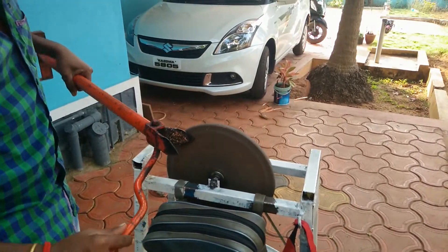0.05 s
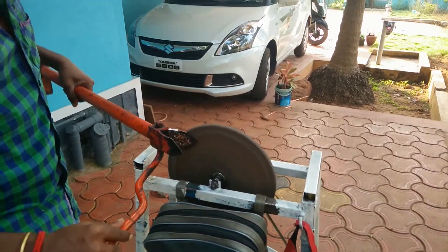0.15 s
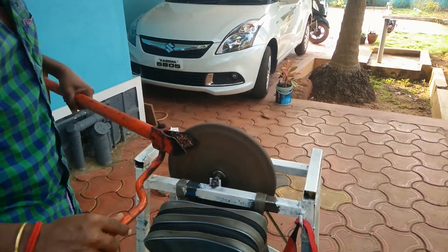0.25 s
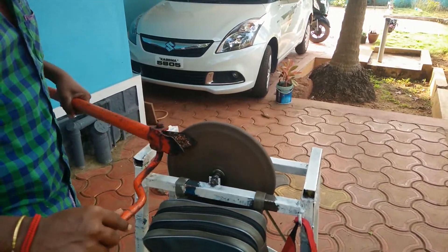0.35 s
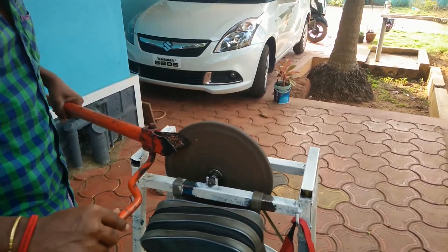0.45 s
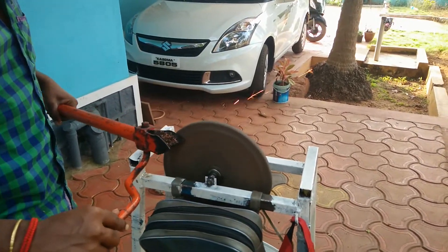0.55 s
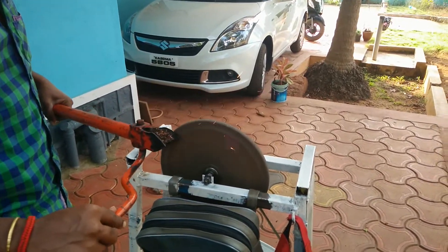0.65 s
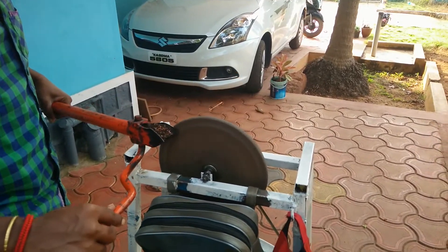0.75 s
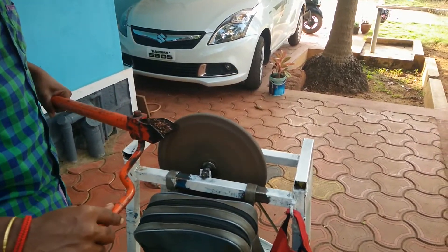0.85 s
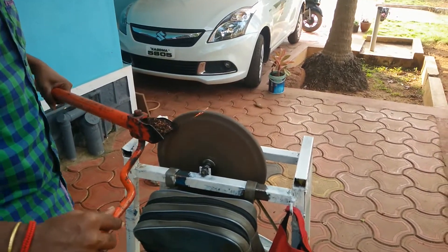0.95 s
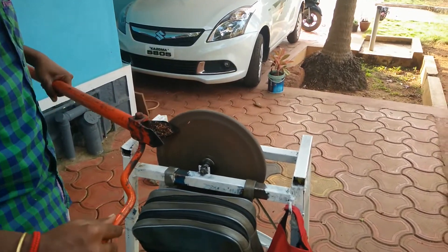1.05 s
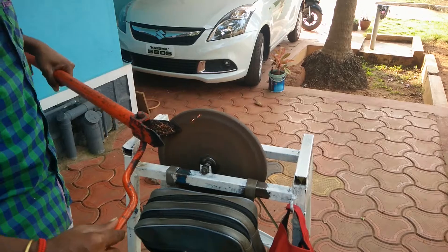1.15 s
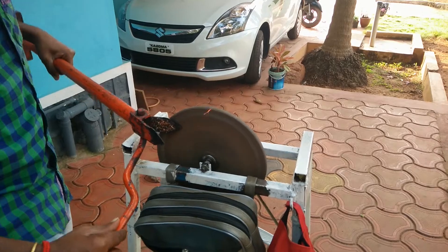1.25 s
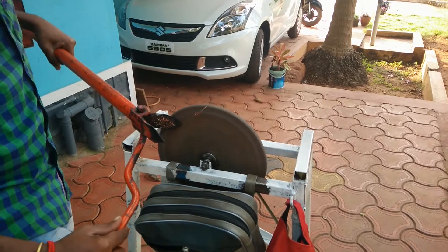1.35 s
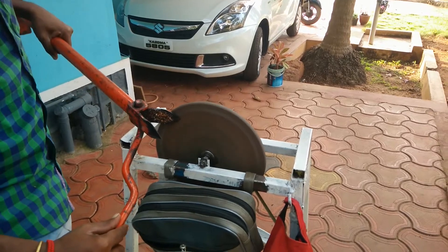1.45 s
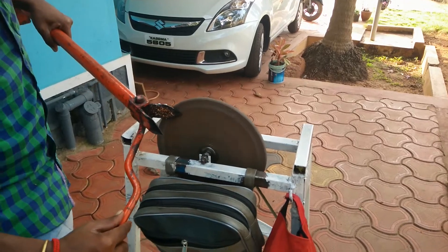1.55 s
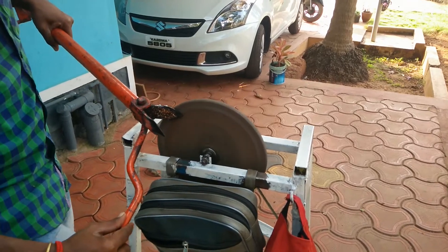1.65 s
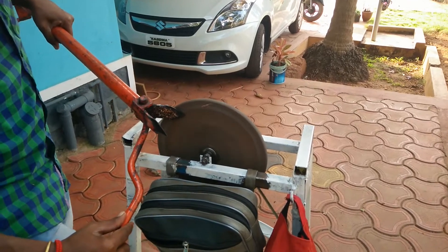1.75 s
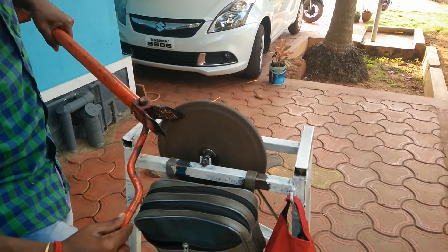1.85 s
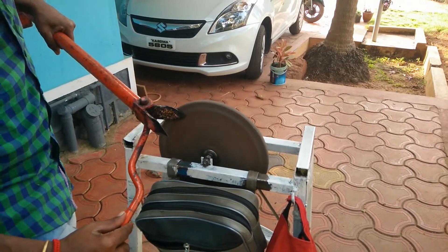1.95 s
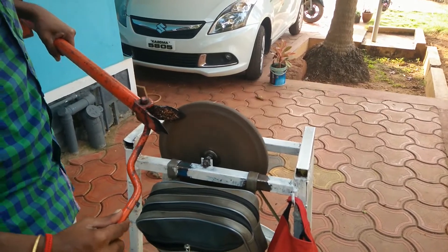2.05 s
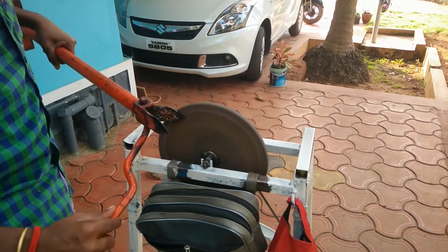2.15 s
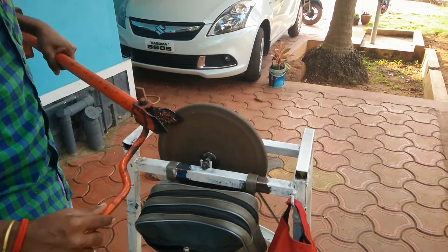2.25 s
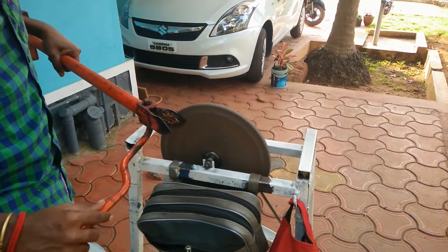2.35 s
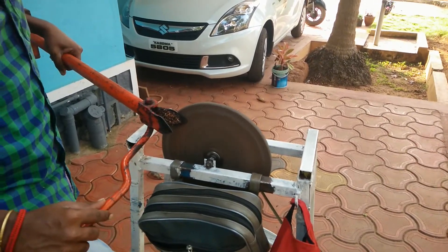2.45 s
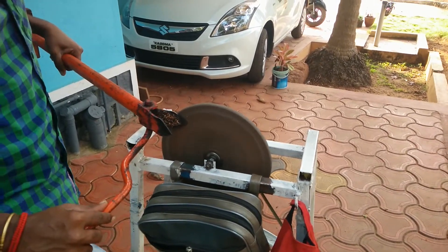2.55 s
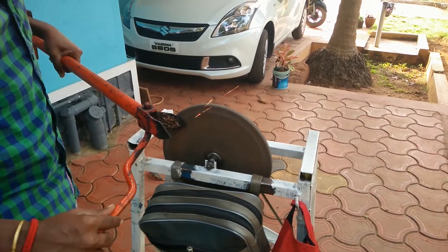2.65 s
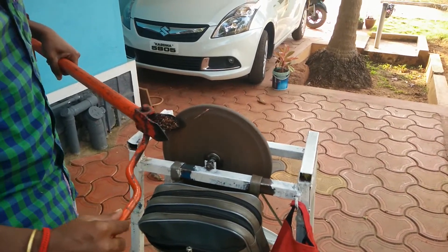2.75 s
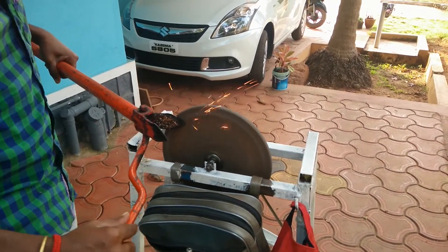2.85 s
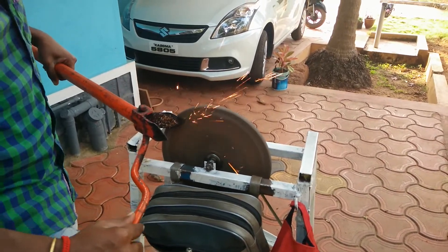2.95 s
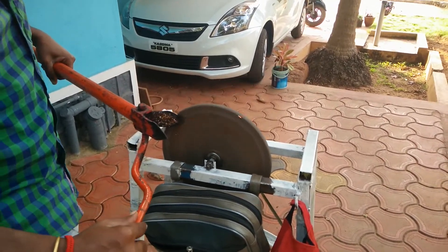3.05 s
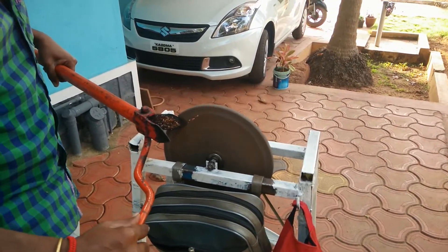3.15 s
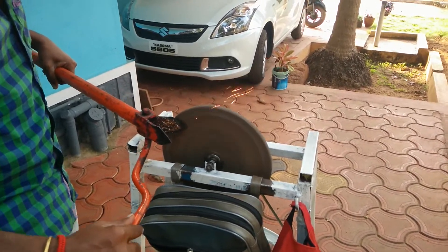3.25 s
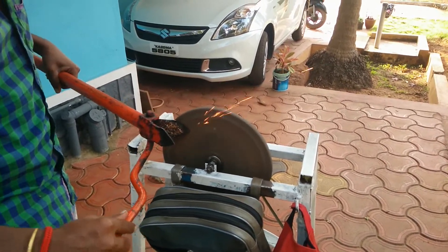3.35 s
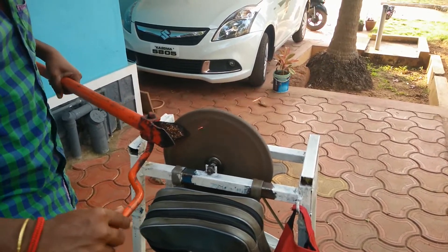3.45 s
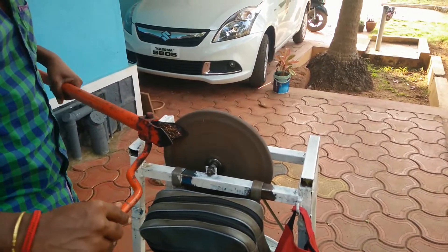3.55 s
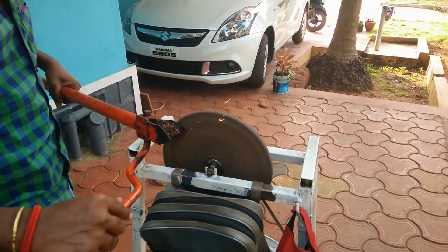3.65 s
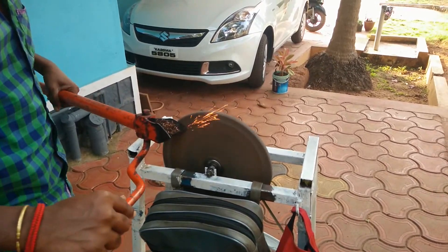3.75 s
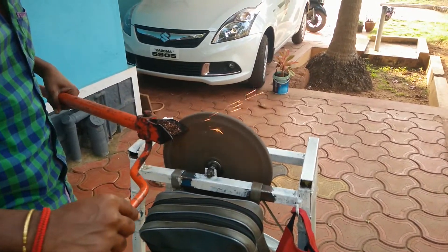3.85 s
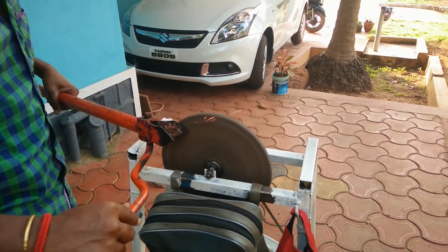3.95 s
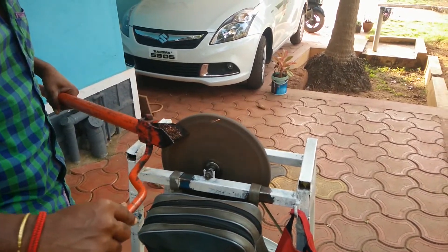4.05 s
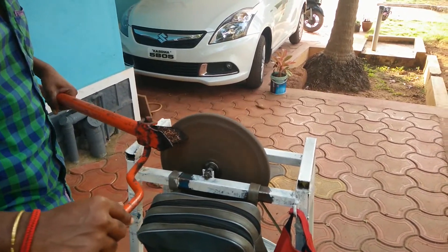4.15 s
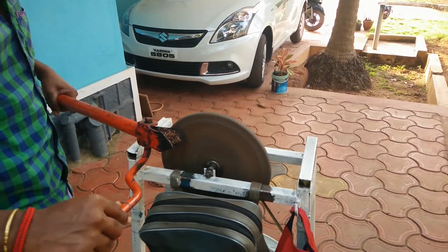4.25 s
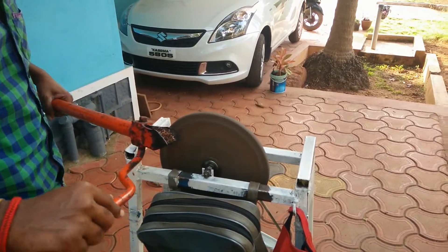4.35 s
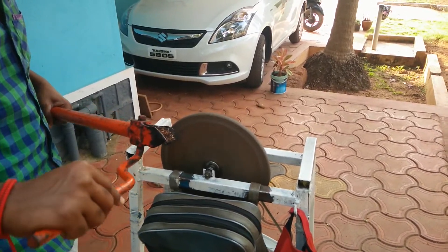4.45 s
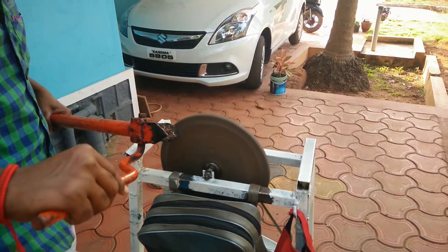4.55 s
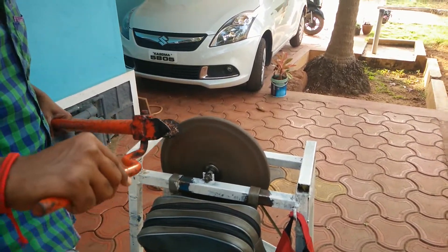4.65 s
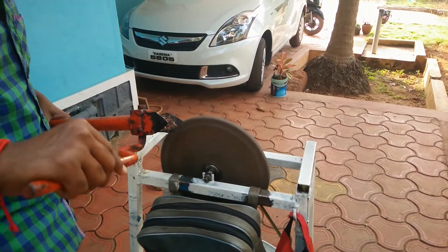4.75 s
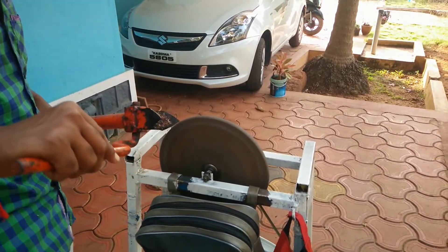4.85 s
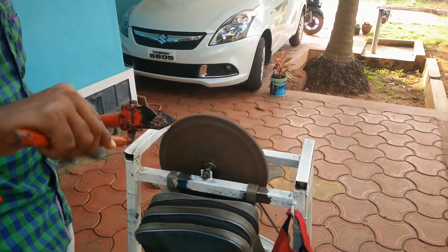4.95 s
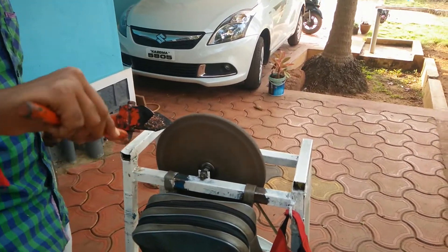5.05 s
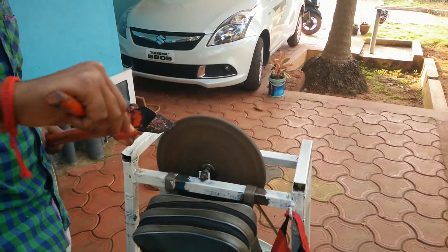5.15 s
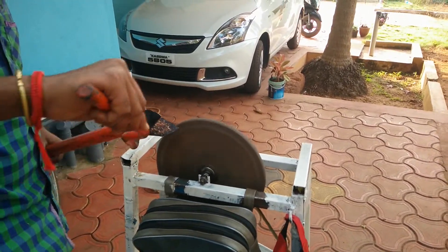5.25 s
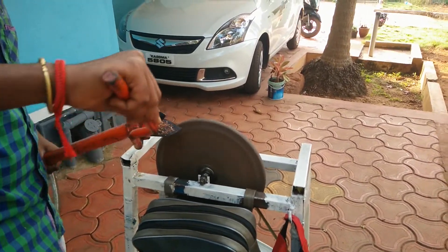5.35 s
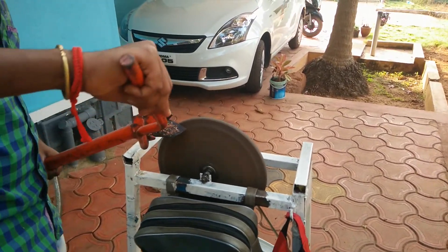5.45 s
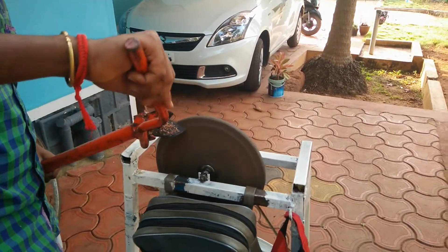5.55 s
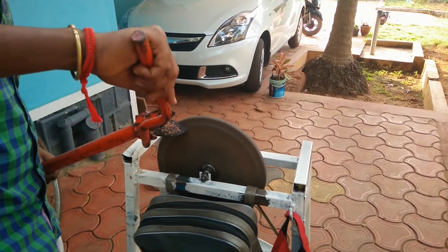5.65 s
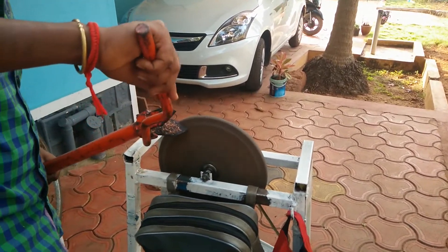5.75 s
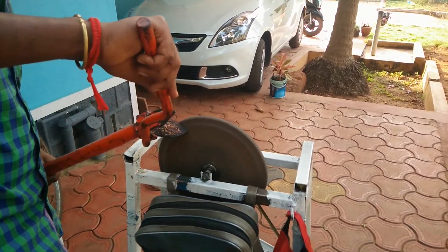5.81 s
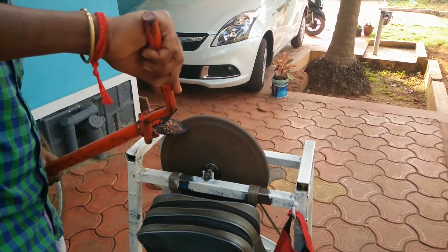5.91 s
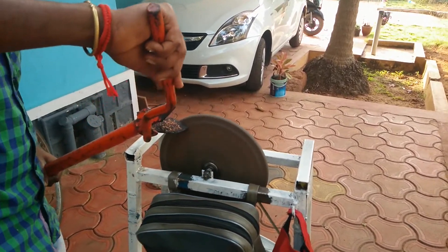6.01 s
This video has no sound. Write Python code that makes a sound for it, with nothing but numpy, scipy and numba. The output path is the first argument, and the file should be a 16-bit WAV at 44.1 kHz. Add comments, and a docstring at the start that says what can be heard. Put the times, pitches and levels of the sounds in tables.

```python
"""In a paved yard, a steel blade is pressed on a spinning grinding wheel, heard at a left and a right microphone port.
The wheel runs out of true, so the blade bounces: each touch is shaped noise for the scrape plus ringing wheel modes.
The blade is lifted, its holder is turned by hand with soft rubs and dull knocks, and it touches again.
Below, the drive hums, rattles and thuds as noise through resonances, over steady yard air and a faint echo.
The right port is the more open one; the highest peaks are limited and clipped."""
import sys
import numpy as np
from scipy import signal
from scipy.fft import rfft, irfft, next_fast_len
from scipy.io import wavfile
from scipy.ndimage import uniform_filter1d, minimum_filter1d, map_coordinates
from numba import njit

SR = 44100
rng = np.random.default_rng(int(sys.argv[2]) if len(sys.argv) > 2 else 0)


def file_out(sig):
    """Save sig as 16-bit WAV at sys.argv[1]."""
    # one column per channel
    cols = np.atleast_2d(sig).T
    # limit, then scale
    lim = np.clip(cols, -1, 1)
    pcm = np.round(lim * 32767).astype(np.int16)
    wavfile.write(sys.argv[1], SR, pcm)


N = 268128  # length in samples


def amp(db):
    """Turn decibels into a plain gain."""
    return 10 ** (np.asarray(db) / 20)


def unit(x):
    """Scale to an average (rms) size of 1."""
    return x / np.sqrt(np.mean(np.abs(x) ** 2) + 1e-20)


def along(points, hz):
    """Read (Hz, value) points as a curve on a log frequency axis."""
    f, v = np.transpose(points)
    return np.interp(np.log(hz + 1), np.log(f + 1), v)


def wobble(rate):
    """A smooth curve through random values, rate of them a second."""
    coarse = np.arange(0, N + 32, 32)  # work out every 32nd sample, then join the dots
    knots = rng.standard_normal(int(N * rate / SR) + 4)
    return np.interp(np.arange(N), coarse, map_coordinates(knots, [coarse * rate / SR]))


def filtered(x, response):
    """Multiply the spectrum of x by a response, which may be complex."""
    m = next_fast_len(N + SR // 2)
    hz = np.fft.rfftfreq(m, 1 / SR)
    return irfft(rfft(x, m) * response(hz), m)[..., :N]


def resonances(peaks):
    """Gain of several resonances (Hz, width Hz, dB), their powers added together."""
    def gain(f):
        power = sum(amp(db) ** 2 / (1 + (2 * (f - centre) / width) ** 2) ** 2 for centre, width, db in peaks)
        return np.sqrt(power)
    return gain


def bursts(times, levels_db, lengths, rise):
    """Add up quick rises that each fade over their own length; lengths are held within 3 to 80 ms."""
    out, t = np.zeros(N + SR), np.arange(SR // 4) / SR
    for start, db, length in zip(times, levels_db, np.clip(lengths, .003, .08)):
        shape = (1 - np.exp(-t / rise)) * np.exp(-(t / length) ** 2)
        out[max(round(start * SR), 0):][:len(t)] += amp(db) * shape
    return out[:N]


def patchy(x, depth_db):
    """Make the sound uneven with random gain patches in time and frequency."""
    z = signal.stft(x, nperseg=256)[2]
    field = rng.standard_normal(z.shape[1:])
    field = uniform_filter1d(uniform_filter1d(field, size=4, axis=0), size=5, axis=1)
    return signal.istft(z * amp(depth_db * unit(field)), nperseg=256)[1][:, :N]


# How much louder the left port is. Each row: frequency in Hz, left over right in dB.
LEFT_OVER_RIGHT = [(300, -4.5), (700, -5.5), (2000, -10), (3700, -9.5), (5000, -4.5), (6500, -1),
                   (9000, -0.5)]
# How alike the noise is at the ports. Each row: frequency in Hz, likeness from 0 to 1.
LIKENESS = [(30, .4), (100, 0.91), (500, 0.91), (700, 0.98), (1200, 0.81), (2000, 1), (3000, 0.37),
            (4700, 0.62), (5700, 0.25), (7000, 0.063)]


def ports(colour, level, lead=.00011):
    """Coloured noise under a level curve at both ports: partly alike, shaded and earlier (lead in s) on the left."""
    def mix(hz):
        turn = np.arccos(np.clip(along(LIKENESS, hz), 0, 1)) / 2
        return colour(hz) * [np.cos(turn), np.sin(turn)]

    shared, opposed = filtered(rng.standard_normal((2, N)), mix)
    side = np.array([[1], [-1]])  # left, right

    def place(hz):
        return amp(side * along(LEFT_OVER_RIGHT, hz) / 2) * np.exp(1j * np.pi * side * hz * lead)

    pair = filtered(np.array([shared + opposed, shared - opposed]), place)
    return level * unit(pair)


# Colour of the yard's air. Each row: frequency in Hz, relative level in dB per Hz.
YARD_COLOUR = [(25, -46.5), (60, -18.5), (130, -2.5), (300, -10.5), (1000, -5), (2000, -9.5), (4000, -14),
               (7000, -17), (7600, -54.5), (9500, -47.5)]


def yard_air():
    """The steady air of the yard is coloured noise at one level."""
    return ports(lambda hz: amp(along(YARD_COLOUR, hz)), amp(-50.5))


# Level of the drive over time. Each row: time in seconds, hum in dB, rattle in dB (both before their wobbles).
DRIVE_LEVELS = [(0.0, -51, -42.5), (0.71, -50, -48.5), (2.101, -53.5, -50), (2.541, -47.5, -43.5),
                (2.828, -52, -50.5), (4.23, -53, -61), (4.45, -51.5, -51.5), (5.49, -50.5, -49),
                (5.72, -47, -46), (6.08, -48, -45)]
# Resonances of the frame. Each row: centre in Hz, width in Hz, relative level in dB.
FRAME_HUM = [(136, 61, -10.5), (263, 75, 3), (426.6, 90, -2)]
# Resonances of the loose parts. Each row: centre in Hz, width in Hz, relative level in dB.
LOOSE_PARTS = [(690, 460, -1), (1016, 53, 4.5), (1366, 120, 4), (2113, 130, 1), (2478, 89, 4.5),
               (3330, 950, -9), (5170, 1200, -15)]
# Hard bites jolt the frame. Each row: start in seconds, level in dB before the slow rise, length in seconds.
FRAME_THUDS = [(1.12, -35, 0.017), (2.457, -31, 0.014), (2.555, -23.5, 0.024), (2.662, -37, 0.022)]


def drive():
    """The frame hums in lumps, loose parts rattle and hard bites thud, all as noise through resonances."""
    s, hum_db, rattle_db = np.transpose(DRIVE_LEVELS)
    t = np.arange(N) / SR
    hum_level = amp(np.interp(t, s, hum_db) + 4.2 * wobble(13))
    hum = ports(resonances(FRAME_HUM), hum_level, lead=0)
    rattle_level = amp(np.interp(t, s, rattle_db) + 1.5 * wobble(15) + 2.8 * wobble(80))
    rattle = ports(resonances(LOOSE_PARTS), rattle_level)
    thud = ports(resonances([(559, 78, -4.5), (663, 92, -4.0)]), bursts(*np.transpose(FRAME_THUDS), rise=0.017))
    return hum + patchy(rattle, depth_db=3.5) + thud


# Soft rubs while the holder is turned.
# Each row: start in seconds, level in dB before the slow rise, length in seconds (held to 0.08 at most).
HAND_RUBS = [(4.95, -41, 0.029), (5.049, -38, 0.047), (5.157, -38.5, 0.049), (5.254, -43, 0.076),
             (5.36, -43, 0.13), (5.487, -32, 0.054), (5.626, -30, 0.049), (5.758, -32.5, 0.051)]
# Colour of the rubs at first, then later. Each row: centre in Hz, width in Hz, relative level in dB.
EARLY_COLOUR = [(2860, 400, -3), (3460, 1300, -5.5)]
LATE_COLOUR = [(2100, 1500, -5.5), (2720, 140, 3.5), (2980, 670, 4.5), (5370, 1760, -15.5)]
HISS_TIMES_S, HISS_DB = (5.09, 5.38, 6.9), -51.5  # faint hiss between rubs: starts, full, ends; level before wobble
COLOUR_SINKS_S = (5.1, 5.54)  # the rub colour sinks between these times


def rubs():
    """Soft rubs and a faint hiss cross from an early colour to a lower one as the hand closes on the handle."""
    t = np.arange(N) / SR
    hiss = amp(HISS_DB + 3.9 * wobble(17)) * np.interp(t, HISS_TIMES_S, [0, 1, 1], right=0)
    stroke = amp(1.57 * wobble(120)) * (bursts(*np.transpose(HAND_RUBS), rise=0.022) + hiss)
    late = np.interp(t, COLOUR_SINKS_S, [0, 1])
    early_rub = ports(resonances(EARLY_COLOUR), stroke * np.sqrt(1 - late))
    late_rub = ports(resonances(LATE_COLOUR), stroke * np.sqrt(late))
    return early_rub + late_rub


# Dull knocks of the handle. Each row: start in seconds, level in dB before sharing, strongest near this Hz.
HANDLE_KNOCKS = [(4.593, -42, 1170), (4.759, -41, 704), (5.039, -32, 405), (5.075, -31.5, 378),
                 (5.447, -40.5, 1500), (5.659, -40, 624), (5.774, -39, 720), (5.813, -36.5, 766)]
# Resonances of the handle. Each row: centre in Hz, width in Hz, relative level in dB.
HANDLE_MODES = [(378, 70, 4), (710, 320, 3.5), (1040, 900, -6.5), (1493, 94, 9)]
KNOCK_S, KNOCK_OCTAVES = 0.028, 0.69  # length in s; octaves off centre where a knock is 6 dB down


def knocks():
    """Each knock is a noise burst that favours the handle resonances near its own centre."""
    s, knock_db, hz = np.transpose(HANDLE_KNOCKS)
    total = np.sqrt(sum(amp(2 * db) * width for centre, width, db in HANDLE_MODES))
    out = np.zeros((2, N))
    for centre, width, db in HANDLE_MODES:
        share = amp(db) * np.sqrt(width) / total
        near_db = -6 * (np.log2(centre / hz) / KNOCK_OCTAVES) ** 2
        hits = bursts(s, knock_db + near_db, np.full(len(s), KNOCK_S), rise=0.00186)
        out += ports(resonances([(centre, width, 0)]), share * hits)
    return out


# How long the yard's echo lasts. Each row: frequency in Hz, seconds to fall by 60 dB.
ECHO_TIMES = [(300, 0.57), (2500, 0.21), (8000, 0.027)]


def walls(x):
    """The yard answers with a noise tail in which each frequency dies at its own speed."""
    hz, t, z = signal.stft(rng.standard_normal((2, SR // 2)), SR, nperseg=256)
    fade = amp(-60 * t / along(ECHO_TIMES, hz)[:, None])
    tail = signal.istft(z * fade, SR, nperseg=256)[1]
    delayed = np.pad(x, ((0, 0), (500, 0)))  # in samples
    return signal.fftconvolve(delayed, tail / np.linalg.norm(tail[0]), axes=1)[:, :N]


# Colour of grit on steel. Each row: frequency in Hz, relative level in dB per Hz.
GRIT_COLOUR = [(300, -36), (600, -25.5), (1400, -15.5), (1900, -14), (2900, -15), (3750, -7), (4500, 2),
               (5100, 5), (5850, -10), (7000, 0), (7500, -18), (8400, -26.5), (9000, -16.5), (10000, -51)]
# Broad resonances of the held blade, upper and low. Each row: centre in Hz, width in Hz, relative level in dB.
BLADE_MODES = [(3202, 350, -10.5), (3718, 140, 1.5), (3985, 300, -3.5)]
BLADE_LOW_MODES = [(1806, 110, 0.011), (1987, 110, 0.0099), (2280, 270, 0)]
USUAL_DB, USUAL_S = -15, .03  # ring setting and length of an ordinary touch
SCRAPE_EVEN = .6  # power of the length ratio: scrapes differ less in length than the pushes


def scraping(s, length, scrape_db, blade_db, blade_low_db, halo_db):
    """Grains of grit catch one by one: noise in spurts, a main scrape and a lighter drag, through the blade too."""
    rasp_s = USUAL_S * (length / USUAL_S) ** SCRAPE_EVEN
    spurts = amp(2.3 * wobble(300) + wobble(90) - .7)

    def contact(db):
        scrape = bursts(s, db, 1.263 * rasp_s, rise=0.0021)
        drag = bursts(s, db - 12.5, 2.84 * rasp_s, rise=0.014)
        return spurts * (scrape + drag)

    grit = ports(lambda hz: amp(along(GRIT_COLOUR, hz)), contact(scrape_db))
    blade = ports(resonances(BLADE_MODES), contact(blade_db))
    blade += ports(resonances(BLADE_LOW_MODES), contact(scrape_db + blade_low_db))
    # grit roughens the middle pair of wheel modes
    halo = ports(resonances([(hz, 140, 0) for hz in UPPER_HZ[:2]]), contact(halo_db))
    return patchy(grit, depth_db=3.5) + patchy(blade + halo, depth_db=2.0)


@njit
def gather(push, keep):
    """A resonator's swing: the share keep of it survives each sample, the push adds to it."""
    swing = np.zeros_like(push)
    for i in range(1, len(push)):
        swing[i] = keep[i] * swing[i - 1] + push[i]
    return swing


BLOW_S = .0007  # time constant of a blow's rise


def ring(freqs, modes, force, blows, pressed, slip, waver, favour_db):
    """Modes gather a push, whose phase wanders as new grit passes, and shared blows; the pressed blade damps them."""
    out, keep = np.zeros((2, N)), np.exp(-1 / (BLOW_S * SR))

    def soften(x):  # a blow takes a moment
        return signal.lfilter([(1 - keep) ** 2], np.poly([keep, keep]), x)

    for hz, (db, t60, pan_db, lead) in zip(freqs, modes):
        wander = np.cumsum(rng.standard_normal(N)) * np.sqrt(slip / SR) + 2 * np.pi * rng.random()
        push = force * amp(2.5 * wobble(35) + favour_db * wobble(6.0)) * np.exp(1j * wander)
        pitch = hz * (1 + waver * wobble(25))  # the blade also detunes the wheel a little
        turn = np.exp(2j * np.pi * np.cumsum(pitch) / SR)
        survives = amp(-(60 / max(t60, .03) + pressed) / SR)  # pressed: extra fading in dB per second
        swing = amp(db) * turn * gather(push + soften(blows * turn.conj()), survives)
        out += np.real([amp(pan_db / 2) * np.exp(1j * lead) * swing, amp(-pan_db / 2) * swing])
    return out


# Modes of the wheel; spinning splits each into a pair. Each entry: frequency in Hz (the low ones before waver).
LOW_HZ, MAIN_HZ = [1076, 1144], [2433, 2535]
UPPER_HZ = [4210, 4354, 6352, 6531, 6907, 7154, 8830, 9090, 9465, 9648]  # the same in Hz before waver; the first two are the middle pair
# How those modes ring. Each row: relative level in dB, seconds to fall by 60 dB when free,
# left over right in dB, phase lead of the left in radians.
LOW_MODES = [(-3, 0.56, -4, 0.2), (-1.5, 0.21, -13.5, -0.13)]
MAIN_MODES = [(0, 0.2, -11.5, 0.26), (0, 0.23, -10, 1.08)]
UPPER_MODES = [(1, 0.24, -8, -1.7), (3.5, 0.27, -3, 4), (-1, 0.27, 1.5, 1.03), (-2, 0.16, 10.5, 2.93),
               (-21, 0.23, 3, 5.5), (-15.5, 0.082, 2.5, 19), (-33.5, 0.14, -1, -8), (-21, 0.091, 5, -5.5),
               (-30, 0.21, 13, 1.8), (-36, 0.17, -6.5, -12)]
# Treble modes against the middle pair. Each row: time in seconds, extra drive in dB.
TREBLE_DRIVE = [(0, 1), (.9, 1.5), (1.35, 1), (1.6, -9), (2.5, -0.5), (2.78, 0.5), (3.0, -7), (4.1, 2),
                (6.0, -2.5)]
BLOW_DB, BITE_DB, BITES = 16.5, 11.5, 3  # gain of opening blow, of later bites (times chance), later bites a touch


def ringing(s, length, main_db, low_db, upper_db):
    """Each touch opens with a blow, pushes for its length and bites again at chance moments, driving the modes."""
    # a long touch spreads its push over more samples
    push_db = main_db - 10 * np.log10(np.clip(length, .003, .08) * SR)
    when, size = rng.random((len(s), BITES)), rng.standard_normal((len(s), BITES))
    bite_s = s[:, None] + 1.4 * length[:, None] * when
    at = np.minimum(np.c_[s, bite_s] * SR, N - 1).astype(int)
    bite = np.c_[np.full(len(s), amp(BLOW_DB)), amp(BITE_DB) * size]

    def force(db):
        push = bursts(s, push_db + db, 1.31 * length, rise=0.00013)
        strengths = amp(main_db + db)[:, None] * bite
        return push, np.bincount(at.ravel(), strengths.ravel(), N)

    touching = np.minimum(bursts(s, 0 * s, length, rise=0.00033), 1)
    low = ring(LOW_HZ, LOW_MODES, *force(low_db - 24.0), 400 * touching,
               slip=449, waver=0.00553, favour_db=4)
    main = ring(MAIN_HZ, MAIN_MODES, *force(-24.0), 950 * touching,
                slip=482.6, waver=0.002365, favour_db=1.4)
    middle = ring(UPPER_HZ[:2], UPPER_MODES[:2], *force(upper_db - 25.0), 950 * touching,
                  slip=920, waver=0.0023, favour_db=-6.0)
    treble_db = upper_db + np.interp(s, *np.transpose(TREBLE_DRIVE))
    treble = ring(UPPER_HZ[2:], UPPER_MODES[2:], *force(treble_db - 25.5), 850 * touching,
                  slip=664, waver=0.00163, favour_db=4.0)
    return low + main + middle + treble


# Touches of blade on wheel. Each row: start in seconds, ring setting in dB, length setting in seconds,
# scrape setting in dB, blade resonance setting in dB.
BLADE_TOUCHES = [(0.0, -19.5, 0.0078, -32.5, -25.5), (0.06, -17.5, 0.027, -24.5, -35),
                 (0.079, -8.5, 0.027, -29, -29), (0.1908, -9.5, 0.03, -27.5, -38),
                 (0.242, -14.5, 0.015, -23, -46), (0.296, -9.5, 0.1, -33.5, -54),
                 (0.353, -9.5, 0.043, -29.5, -42), (0.401, -17.5, 0.022, -25, -25),
                 (0.4637, -12.5, 0.014, -23.5, -22), (0.503, -11.5, 0.02, -29, -26.5),
                 (0.551, -24.5, 0.0071, -35, -30.5), (0.564, -13.5, 0.021, -22, -20),
                 (0.6475, -17.5, 0.034, -29.5, -24), (0.681, -10, 0.036, -21.5, -30),
                 (0.792, -9.5, 0.038, -26, -28), (0.856, -12.5, 0.031, -25.5, -29),
                 (0.9138, -11, 0.018, -22.5, -26.5), (0.967, -10.5, 0.027, -30, -33),
                 (1.0723, -7.5, 0.04, -25.5, -22.5), (1.116, -12, 0.016, -20, -24),
                 (1.163, -45, 0.0074, -50.5, -59), (1.215, -13, 0.0036, -24.5, -38),
                 (1.229, -12, 0.019, -28, -29.5), (1.306, -23.5, 0.0067, -25.5, -28),
                 (1.355, -20.5, 0.0066, -23.5, -25), (1.3938, -15, 0.025, -24.5, -40),
                 (1.5045, -13, 0.02, -26.5, -32), (1.621, -23, 0.015, -26.5, -61),
                 (1.6496, -11.5, 0.025, -25, -46), (1.719, -16, 0.029, -29.5, -29),
                 (1.7814, -12, 0.027, -27.5, -42), (1.85, -13.5, 0.027, -36.5, -49.5),
                 (1.888, -19.5, 0.033, -32.5, -34.5), (1.968, -14.5, 0.027, -36.5, -33.5),
                 (2.01, -15.5, 0.021, -28.5, -42.5), (2.0873, -14.5, 0.019, -24.5, -36),
                 (2.1, -10, 0.041, -36, -41.5), (2.171, -11, 0.053, -33.5, -34),
                 (2.207, -6, 0.043, -31, -41), (2.313, -3, 0.051, -29.5, -41.5),
                 (2.338, -14, 0.021, -30, -33.5), (2.408, -7, 0.14, -36.5, -34),
                 (2.4618, -4, 0.01, -32.5, -25.5), (2.501, -4.5, 0.051, -29.5, -29.5),
                 (2.5531, -7, 0.014, -21.5, -20.5), (2.6477, -4.5, 0.032, -34.5, -27.5),
                 (2.67, -21.5, 0.014, -28, -29), (2.786, -17.5, 0.033, -21.5, -35),
                 (2.903, -14, 0.026, -22, -41.5), (2.976, -13, 0.021, -27.5, -30.5),
                 (3.05, -12, 0.033, -27, -26.5), (3.084, -14.5, 0.016, -30.5, -43),
                 (3.116, -11.5, 0.037, -26.5, -30), (3.218, -10.5, 0.032, -24.5, -35.5),
                 (3.309, -11.5, 0.058, -29.5, -27), (3.368, -11.5, 0.042, -29.5, -30.5),
                 (3.434, -22.5, 0.048, -33, -27.5), (3.4787, -13, 0.031, -27.5, -24.5),
                 (3.571, -16.5, 0.058, -26.5, -21), (3.645, -14.5, 0.042, -27, -35),
                 (3.674, -16.5, 0.015, -37, -23), (3.725, -26, 0.0082, -24, -20.5),
                 (3.764, -15.5, 0.028, -26, -23), (3.833, -17, 0.023, -28.5, -39),
                 (3.876, -17.5, 0.035, -27, -25.5), (3.969, -9.5, 0.048, -28.5, -29),
                 (4.01, -14, 0.019, -24, -29), (4.065, -14.5, 0.018, -29, -32.5),
                 (4.125, -9.5, 0.022, -28.5, -26), (4.174, -19, 0.023, -26.5, -28),
                 (5.8414, -18, 0.028, -44, -52), (5.879, -25.5, 0.01, -45.5, -39),
                 (5.889, -9.5, 0.018, -23.5, -39), (6.0168, -12, 0.0099, -24, -43),
                 (6.0567, -12.5, 0.028, -28.5, -45.5)]
# As the blade is moved over the rim, for an ordinary touch. Each row: time in seconds, low blade resonances
# over scrape in dB, drive of the upper ring and of the lowest pair against the main ring in dB.
RIM_PLACES = [(0, -6, -9, -28), (0.499, -13.5, -8.5, -29), (0.901, -6.5, -6, -36), (1.2, -8.5, -12, -33),
              (1.6, -11.5, -2.5, -29), (2.1, -7, -10.5, -29.5), (2.6, -5.5, -4.5, -31.5),
              (2.999, -13, -9, -28), (3.498, -10, -11, -26.5), (4.2, -11, -11.5, -30),
              (5.9, -4.5, -13.5, -36), (6.05, -7.5, -6.5, -15)]
UPPER_GROWS = 0.23  # dB the upper ring gains per dB of ring setting
SCATTER_DB = 3.5  # touch-to-touch chance in the upper ring


def grinding():
    """Every touch scrapes in gritty spurts, drags lightly on, and drives the modes of the wheel."""
    s, main_db, length, scrape_db, blade_db = np.transpose(BLADE_TOUCHES)
    at, *place = np.transpose(RIM_PLACES)
    blade_low_db, upper_db, low_db = [np.interp(s, at, column) for column in place]
    # upper_db counts from the main ring, hence the minus 1
    upper_db = upper_db + (UPPER_GROWS - 1) * (main_db - USUAL_DB) + SCATTER_DB * rng.standard_normal(len(s))
    halo_db = upper_db + main_db - 8.0
    scrape = scraping(s, length, scrape_db, blade_db, blade_low_db, halo_db)
    return scrape + ringing(s, length, main_db, low_db, upper_db)


def scene():
    """The yard's air, the drive, the holder, and the wheel with its echo."""
    air = yard_air()
    holder = patchy(rubs() + knocks(), depth_db=2.0)
    wheel = grinding()
    echo = amp(-20) * walls(wheel)
    return air + drive() + holder + echo + wheel


BAND_HZ, TOP_HZ = 9900, 16000  # upper limits of the microphone and of the clipped sound


def record(dry):
    """The microphone is band limited; a quick limiter lowers the peaks and the converter clips the rest."""
    x = filtered(dry, lambda hz: hz < BAND_HZ)
    need = np.minimum(1, 1.09 / (np.abs(x).max(0) + 1e-9))  # aims a little above full scale
    x = x * uniform_filter1d(minimum_filter1d(need, size=200), size=200)
    clipped = np.clip(x, -1, 1)
    return np.clip(filtered(clipped, lambda hz: hz < TOP_HZ), -1, 1)


dry = scene()
out = record(dry)
file_out(out)
```